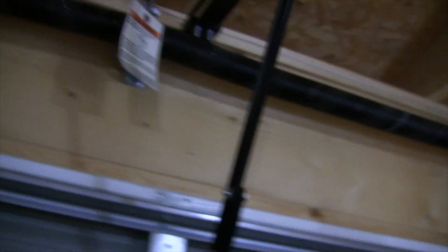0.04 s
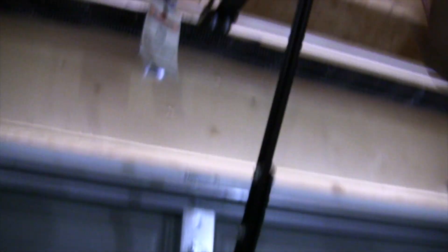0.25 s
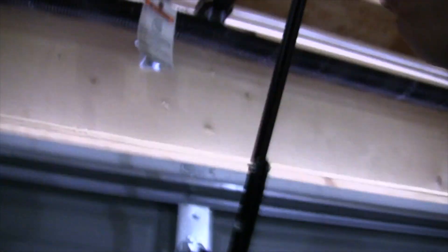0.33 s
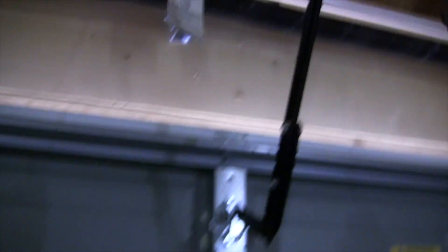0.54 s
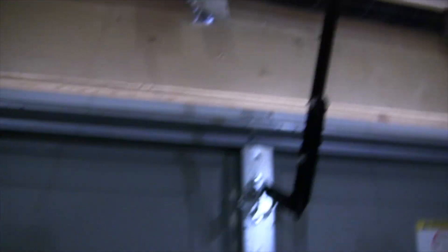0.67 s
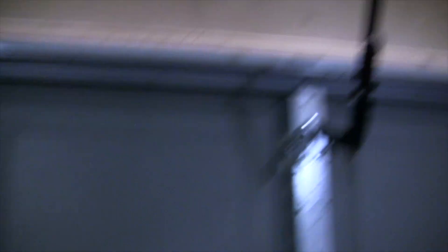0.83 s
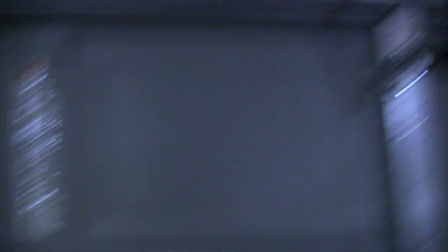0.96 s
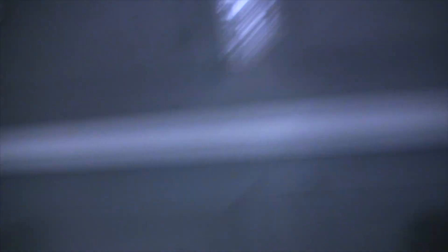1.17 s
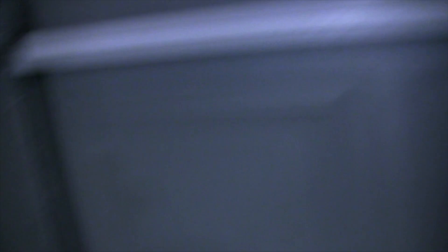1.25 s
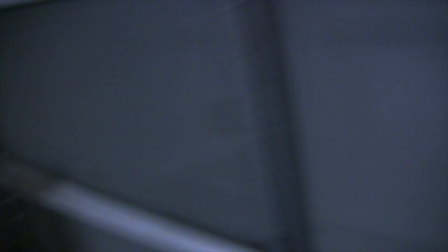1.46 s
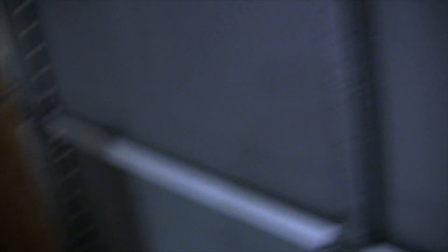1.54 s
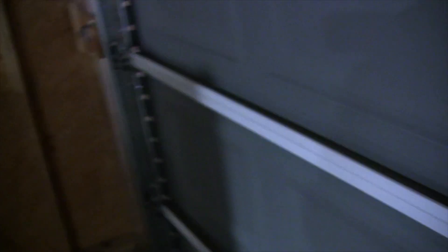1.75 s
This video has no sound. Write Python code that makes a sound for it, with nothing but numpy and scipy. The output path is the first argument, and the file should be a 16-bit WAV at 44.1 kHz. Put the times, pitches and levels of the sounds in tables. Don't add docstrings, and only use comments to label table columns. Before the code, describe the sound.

Metallic rattle and clatter of a garage door opener latch snapping free, with a thin high ring.

```python
import sys
import numpy as np
from scipy import signal
from scipy.fft import rfft, irfft, next_fast_len
from scipy.io import wavfile

SR = 44100
rng = np.random.default_rng(int(sys.argv[2]) if len(sys.argv) > 2 else 0)


def ratio(d):
    e = np.asarray(d, float) / 20
    return 10 ** e


def file_out(sig):
    cols = np.atleast_2d(sig).T
    lim = np.clip(cols, -1, 1)
    pcm = np.round(lim * 32767).astype(np.int16)
    wavfile.write(sys.argv[1], SR, pcm)


N = 79380
TIME = np.arange(N) / SR


def rms_one(x):
    return x / np.sqrt(np.mean(x ** 2) + 1e-20)


def at_hz(points, hz):
    table_hz, table_db = np.transpose(points)
    return np.interp(np.log(hz), np.log(table_hz), table_db)


def over_time(points):
    return np.interp(TIME, *np.transpose(points))


def band_noise(noise, edges_hz, order):
    return signal.sosfilt(signal.butter(order, edges_hz, "band", fs=SR, output="sos"), noise)


def coloured(x, spectrum):
    length = x.shape[-1]
    size = next_fast_len(length)
    hz = np.maximum(np.fft.rfftfreq(size, 1 / SR), 1)
    return irfft(rfft(x, size) * ratio(at_hz(spectrum, hz)), size)[..., :length]


def ring(force, hz, t60):
    radius = ratio(-60 / (t60 * SR))
    angle = 2 * np.pi * hz / SR
    feedback = [1, -2 * radius * np.cos(angle), radius * radius]
    return signal.lfilter([0, np.sin(angle)], feedback, force + 1e-18)


def contacts(per_s, spread_db):
    sizes = ratio(spread_db * np.minimum(rng.exponential(1, N), 4)) * rng.choice([-1, 1], N)
    return rms_one(sizes * (rng.random(N) < per_s / SR))


def bursts(s, db, length, t60):
    attack_s = 0.0029
    t = TIME[None] - np.array(s)[:, None]
    rise = np.clip(t / attack_s, 0, 1)
    fall = ratio(-60 * np.clip(t - np.array(length)[:, None], 0, 2) / t60)
    blows = ratio(np.array(db))[:, None] * rise * fall
    return np.sqrt(np.sum(blows ** 2, axis=0))


def body(force, spectrum, cycles, count):
    low, high = spectrum[1][0] * .8, spectrum[-2][0] * 1.1
    hzs = np.geomspace(low, high, count) * rng.uniform(.985, 1.015, count)
    signs = (-1) ** np.arange(count)
    gains = ratio(at_hz(spectrum, hzs) + rng.normal(0, 1.0, count)) * hzs * signs

    def response(x):
        return sum(g * ring(x, hz, cycles / hz) for g, hz in zip(gains, hzs))

    click = np.eye(1, SR // 2)[0]
    return response(force) / np.sqrt(np.sum(response(click) ** 2))


def clear_modes(force, modes):
    return sum(ratio(db) * ring(force, hz, t60) * np.sqrt(4 * np.log(1000) / (t60 * SR))
               for hz, db, t60 in modes)


def glide(rows, width_hz):
    s, hz, db = np.transpose(rows)
    radius = np.exp(-np.pi * width_hz / SR)
    slow = signal.lfilter([1], [1, -radius], rng.standard_normal((2, N)))
    phase = 2 * np.pi * np.cumsum(np.interp(TIME, s, hz)) / SR
    tone = slow[0] * np.cos(phase) + slow[1] * np.sin(phase)
    return ratio(np.interp(TIME, s, db, -120, -120)) * rms_one(tone)


# [t/s, peak level/dB, bright part level/dB, length/s]
SCRAPES = [
    (0.096, -34, -13, 0.17),
    (0.219, -15, -2, 0.0052),
    (0.2243, 1, -11.5, 0.019),
    (0.225, -16, 7, .002),
    (1.334, -31.5, -19, 0.012),
    (1.342, -16, -20, 0.018),
    (1.36, -23.5, -18, 0.062),
    (1.41, -33, -8, 0.088),
]
# [f/Hz, level/dB]
LATCH = [(1200, -40), (2400, -15), (3050, -6), (3450, -0.5), (3800, -12), (4300, 3.5), (4750, -13),
         (7500, -14)]
# [f/Hz, level/dB, t60/s]
HOOK = [(3317, -12.5, 0.059), (3424, -14.5, 0.038), (3974, -8, 0.089), (4884, -10, 0.055)]


def latch():
    s, db, _, length = np.transpose(SCRAPES)
    scrape = bursts(s, db - 14, length, t60=0.067) * contacts(4000, 4.3)
    return body(scrape, LATCH, cycles=23.0, count=44) + clear_modes(scrape, HOOK)


# [t/s, level/dB]
SHAKE = [(0, -49.5), (.18, -58), (.28, -25.5), (.4, -19.5), (.46, -20), (.536, -17.5), (.646, -20.5),
         (.85, -20.5), (1.022, -23), (1.17, -23.5), (1.272, -30), (1.33, -32), (1.42, -32), (1.568, -41.5),
         (1.631, -54), (1.69, -51), (1.8, -44.5)]


def shake_db():
    return over_time(SHAKE)


def loose_play(level_db, follows):
    shaking = shake_db()
    top = shaking.max()
    return ratio(top + level_db + follows * (shaking - top))


# [t/s, peak level/dB, bright part level/dB, length/s]
CLANKS = [(0.285, -8.5, -1.5, 0.0065), (0.292, -19.5, -5, .0064), (0.356, -13.5, -7.5, .0047),
          (0.434, -10.5, -4, 0.0068), (0.4545, -10.5, -4, 0.0046), (0.51, -4, -16.5, 0.0059),
          (0.586, -9.5, -4, 0.0023), (0.655, -11, -4, 0.0036), (0.725, -10, -17.5, 0.007),
          (0.777, -10.5, -7.5, 0.0044), (0.882, -18, -10, .0056), (0.921, -18.5, -16, 0.012),
          (0.949, -20, -34, 0.0053), (1.089, -17.5, -16, 0.014), (1.152, -49, -25, .008),
          (1.508, -32.5, -9, 0.0055), (1.543, -26.5, -18, 0.0092)]
# [f/Hz, level/dB]
CLANK = [(880, -19), (1500, -2), (3150, -3), (3720, 2), (5010, -10.5), (6300, -17.5), (7500, -23),
         (9750, -32)]


def arm_and_rail():
    s, db, _, length = np.transpose(CLANKS)
    crack = bursts(s, db - 11, 0.1 * length, t60=0.01)
    force = crack + bursts(s, db - 12, length, t60=0.17) + loose_play(-6, follows=2.5)
    return body(force * contacts(4000, 4.6), CLANK, cycles=31.4, count=40)


# [f/Hz, level/dB]
BRIGHT = [(3240, 6), (5500, 9), (7290, -3), (9050, -1.5), (10200, 1.5), (11800, 0.5), (13700, -8.5),
          (15500, -99)]


def small_parts():
    s, db, bright_db, length = np.transpose(CLANKS)
    crack = bursts(s, db + bright_db, 0.04 * length, t60=0.01)
    force = crack + bursts(s, db - 6 + bright_db, 0.5 * length, t60=0.32) + loose_play(-16, follows=7.9)
    s, db, bright_db, length = np.transpose(SCRAPES)
    force = force + bursts(s, db - 8.5 + bright_db, length, t60=0.068)
    return body(force * contacts(5000, 2.3), BRIGHT, cycles=84.0, count=40)


# [t/s, peak level/dB, centre f/Hz, t60/s]
TICKS = [(.2258, -4.5, 11400, 0.0083), (0.2245, -6, 3570, .012), (0.2345, -6, 3430, 0.022),
         (.242, -20, 3400, 0.027), (.2475, -2, 4100, 0.013), (.2851, -24, 12000, .02),
         (.2956, -11, 11300, .02), (.4378, -10, 4200, .015), (0.4571, -7.5, 11450, 0.039),
         (0.4563, -9, 3230, 0.014), (0.5138, -8, 5500, 0.016), (0.5904, -5, 3000, 0.014),
         (0.591, -13.5, 11400, .02), (0.662, -6.5, 5870, 0.022), (.664, -7.5, 3680, 0.04),
         (.735, -18, 780, 0.11), (0.75, -15.5, 289, 0.21), (.745, -10, 565, 0.18),
         (0.7772, -11, 6000, 0.028), (.781, -5.5, 2630, 0.012), (0.879, -20, 6000, .02),
         (1.094, -37, 8200, .02), (1.35, -24, 1720, 0.012), (1.406, -38, 8000, .015),
         (1.6896, -38, 4600, 0.027)]


def ticks():
    width = 0.13
    out = np.zeros(N + SR)
    t = np.arange(SR // 10) / SR
    for s, db, hz, t60 in TICKS:
        spray = rng.standard_normal(len(t)) * ratio(-60 * t / t60)
        edges = hz * np.array([1 - width / 2, 1 + width / 2])
        edges = np.minimum(edges, .45 * SR - np.array([100, 0]))
        knock = band_noise(spray, edges, order=1)
        out[int(s * SR):][:len(t)] += ratio(db) * knock / np.abs(knock).max()
    return out[:N]


# [f/Hz, level/dB]
PANEL = [(30, -33), (45, -22.5), (190, -3), (386, -4.5), (650, 2), (1000, -5), (1760, -4.5), (4300, -18),
         (5600, -33), (7000, -70)]
# [f/Hz, level/dB, t60/s]
SHEET = [(210.8, -22, 0.33), (297, -21.5, 0.7), (367, -16, 0.15), (543, -15, 0.41), (657, -19, 0.25),
         (771, -14, 0.48), (1173, -20.5, 0.29), (1469, -16, 0.14), (1706, -21.5, .3)]
# [t/s, peak level/dB, length/s]
JOLTS = [(0.11, -30.5, 0.062), (0.16, -30.5, 0.012), (0.216, -10, 0.0065), (0.306, -13.5, 0.0099),
         (0.338, -7, 0.0083), (0.394, -5, 0.0068), (0.449, -17, .013), (0.504, -6, 0.0069),
         (0.59, -13.5, 0.0058), (0.625, -6, 0.0084), (0.64, -22, 0.0042), (0.708, -8, 0.019),
         (0.722, -5, 0.021), (0.763, -5.5, 0.0088), (0.949, -8, 0.015), (1.027, -19, 0.019),
         (1.144, -15, 0.0067), (1.285, -41, 0.0084), (1.333, -16.5, 0.04), (1.534, -38, 0.0099),
         (1.697, -32.5, .01)]
# [f/Hz, level/dB]
JOLT = [(59, -56), (100, -9), (584, -5), (1780, 0.5), (2640, -10), (2870, -6.5), (5320, -14.5), (6000, -60),
        (7800, -144), (13200, -120)]


def panels():
    shaking = ratio(shake_db()) * contacts(6000, 2.3)
    rumble = body(shaking, PANEL, cycles=33.3, count=60) + clear_modes(shaking, SHEET)
    s, db, length = np.transpose(JOLTS)
    jolts = bursts(s, db - 11, length, t60=0.31) * contacts(3000, 2.8)
    return rumble + body(jolts, JOLT, cycles=29.0, count=50)


# [t/s, lower, middle and upper mode level/dB]
RING_BLOWS = [(0.296, -28, -29, -20), (0.353, -15.5, -40, -30), (0.381, -14, -42, -38),
              (.439, -30, -22, -34), (0.457, -32, -21, -27), (.487, -24, -23, -42), (.567, -26, -30, -44),
              (0.594, -37, -17.5, -23), (.628, -21, -24.5, -37), (0.662, -22, -19, -18),
              (0.739, -21, -22, -41), (.78, -25, -24, -24), (.82, -27, -32, -41), (0.861, -27, -26, -21),
              (.923, -44, -38.5, -31)]
# [f/Hz, t60/s]
RING = [(5447, 0.16), (5482, 0.33), (5525, 0.13)]
# [f/Hz, level under the blow/dB, t60/s]
RING_UPPER = [(6017, -16, .12), (8180, -30, .15), (10220, -18, .15), (13917, -24, .2)]


def thin_ring():
    s, *levels = np.transpose(RING_BLOWS)
    blows = np.zeros(N)
    blows[(s * SR).astype(int)] = ratio(np.max(levels, axis=0))
    close = sum(bursts(s, db, 0 * s, t60) * np.sin(2 * np.pi * hz * TIME)
                for db, (hz, t60) in zip(levels, RING))
    return close + sum(ratio(db) * ring(blows, hz, t60) for hz, db, t60 in RING_UPPER)


# [t/s, f/Hz, level/dB]
SQUEAL = [
    (1.33, 4590, -44),
    (1.34, 4490, -30),
    (1.35, 3800, -35),
    (1.36, 2820, -25.5),
    (1.37, 3510, -33),
    (1.382, 4500, -36),
    (1.4, 4430, -60),
]


def squeal():
    return glide(SQUEAL, width_hz=160)


# [t/s, level/dB]
ROLL = [
    (0.0, -72),
    (0.194, -60),
    (0.23, -32.5),
    (0.842, -51),
    (0.922, -37.5),
    (1.132, -27.5),
    (1.432, -37.5),
    (1.648, -37),
    (1.684, -39),
    (1.8, -37.5),
]


def roll():
    drone = band_noise(rng.standard_normal(N), (68, 199), order=2)
    return ratio(over_time(ROLL) - 6.5) * rms_one(drone)


# [t/s, rms level/dB, length/s]
SETTLE = [
    (1.688, -40, .004),
    (1.695, -39.5, 0.017),
    (1.729, -46.5, 0.047),
    (1.759, -48, 0.025),
]
# [f/Hz, level/dB, t60/s]
ROLLER = [(2920, 1, 0.022), (3170, 1, 0.021), (3800, -7, 0.0044), (4430, 1.5, 0.008), (4780, -4, 0.015),
          (6300, -40, 0.0048), (10200, -17, 0.0013)]


def settle():
    grit = contacts(2500, 0.81)
    rattle = sum(ratio(db) * rms_one(ring(grit, hz, t60)) for hz, db, t60 in ROLLER)
    return bursts(*np.transpose(SETTLE), t60=0.088) * rms_one(rattle)


# [t/s, f/Hz, level/dB]
HUM = [
    (0, 1549, -39),
    (.05, 1555, -46.5),
    (.1, 1550, -55),
    (.13, 1742, -40),
    (.155, 1594, -42),
    (.175, 1496, -34),
    (.19, 1510, -52),
    (.215, 1530, -36.5),
    (.24, 1558, -62),
]


def hum():
    return glide(HUM, width_hz=10)


# [f/Hz, width/Hz, level/dB]
CREAK = [(452, 9, -49.5), (1363, 34, -52.5), (1220, 200, -52), (1630, 200, -53)]


def creak():
    end_s, fade_s = 0.34, 0.094
    fade = np.clip((end_s - TIME) / fade_s, 0, 1)
    return fade * sum(ratio(db) * rms_one(ring(contacts(560, 0.83), hz, 2.0 / width))
                      for hz, width, db in CREAK)


# [f/Hz, t60/s]
WALLS_T60 = [(100, 3.1), (500, 0.87), (2000, 0.4), (5000, 0.52), (12000, 0.32)]
# [f/Hz, level under mid/dB]
SIDE_SHARE = [(60, -14), (130, -19), (290, -16.5), (640, -17), (1410, -18.5), (3100, -24), (6820, -3),
              (15000, -12)]


def garage(x):
    t = np.arange(SR) / SR
    lows = 30 * 2 ** np.arange(0, 10.)
    echoes = 0
    for low, high in zip(lows, np.minimum(lows * 2, .45 * SR)):
        t60 = at_hz(WALLS_T60, np.sqrt(low * high))
        band = band_noise(rng.standard_normal((2, SR)), [low, high], order=2)
        echoes = echoes + band * ratio(-60 * t / t60) * np.sqrt(14 / SR / t60)
    echoes = echoes * np.clip((t - .004) / 0.041, 0, 1)
    early = rng.standard_normal(SR) * ratio(-60 * t / 0.045)
    early = early / np.sqrt(np.sum(early ** 2))
    response = ratio(-6.5) * echoes + [[0], [1]] * early
    mid, side = signal.fftconvolve(x[None], response, axes=1)[:, :N]
    return x + mid, coloured(side, SIDE_SHARE)


# [f/Hz, level/dB]
AIR = [(25, -21), (120, -7.5), (450, -5), (1000, -24), (2500, -11.5), (6000, -27), (15500, -44)]


def still_air():
    mid, side = ratio(-46.5) * rms_one(coloured(rng.standard_normal((2, N)), AIR))
    return mid, coloured(side, SIDE_SHARE)


def scene():
    door = panels() + (arm_and_rail() + latch() + small_parts()) + thin_ring()
    mid, side = garage(door + creak() + roll() + settle() + ticks() + squeal() + hum())
    air_mid, air_side = still_air()
    mid, side = mid + air_mid, side + air_side
    left_db = 0.32
    return np.array([(mid + side) * ratio(left_db), (mid - side) * ratio(-left_db)])


def roll_off(x):
    return signal.sosfilt(signal.butter(12, 15720, fs=SR, output="sos"), x)


def record(dry):
    top = .97
    heard = top * np.tanh(dry / top)
    heard = signal.sosfilt(signal.butter(10, 13600, fs=SR, output="sos"), heard)
    heard = signal.sosfilt(signal.butter(2, 40.3, "high", fs=SR, output="sos"), heard)
    return roll_off(heard)


dry = scene()
out = record(dry)
file_out(out)
```